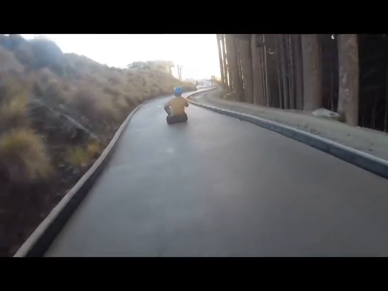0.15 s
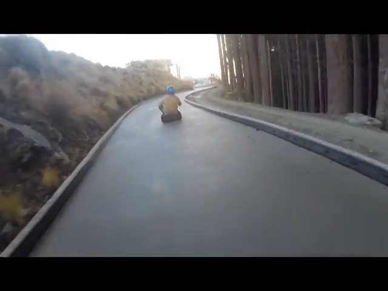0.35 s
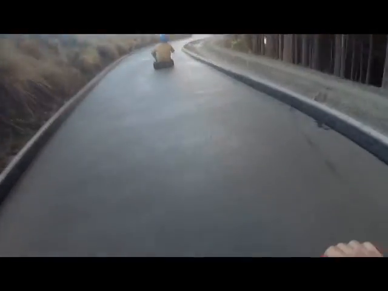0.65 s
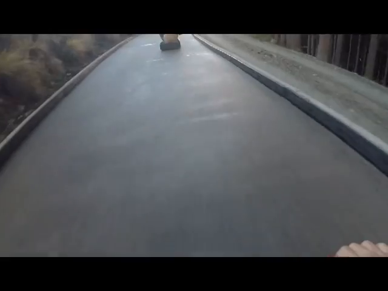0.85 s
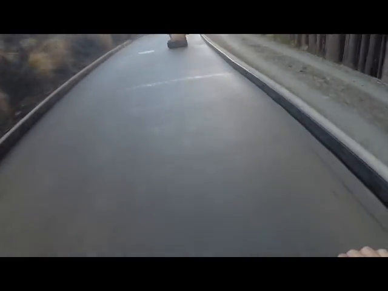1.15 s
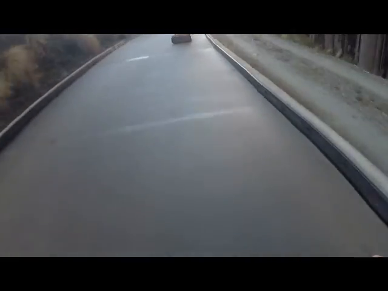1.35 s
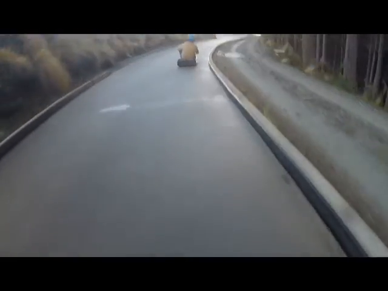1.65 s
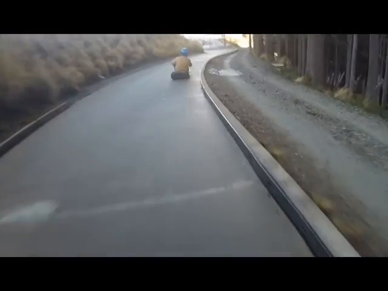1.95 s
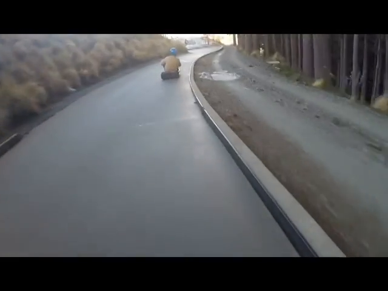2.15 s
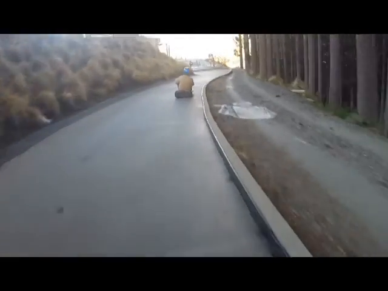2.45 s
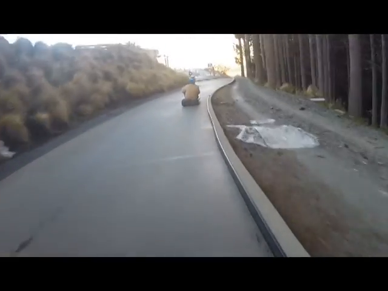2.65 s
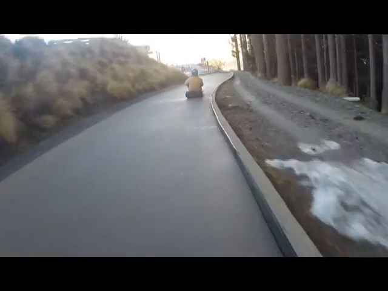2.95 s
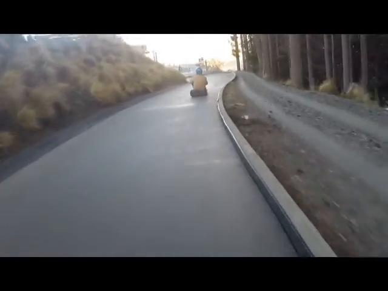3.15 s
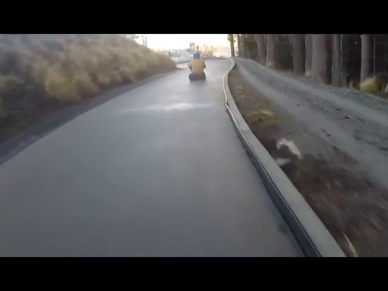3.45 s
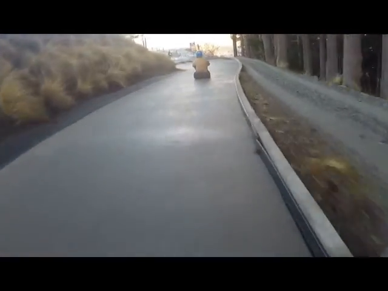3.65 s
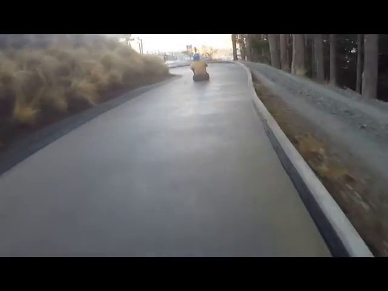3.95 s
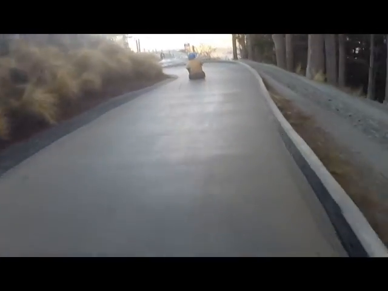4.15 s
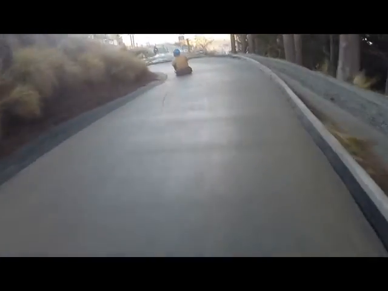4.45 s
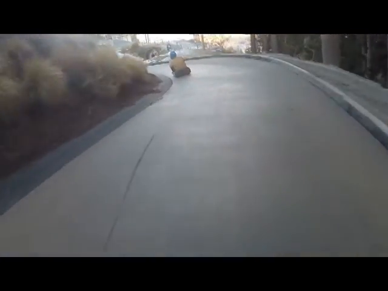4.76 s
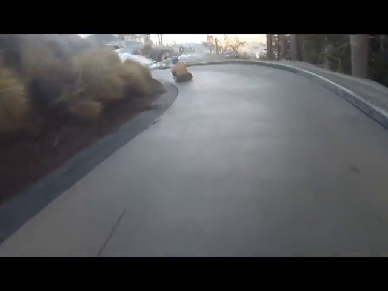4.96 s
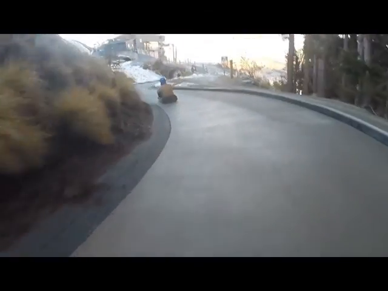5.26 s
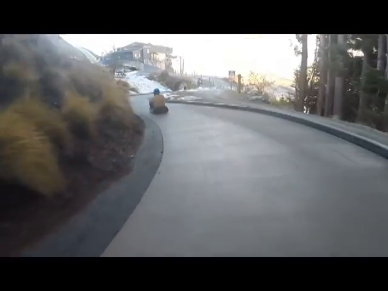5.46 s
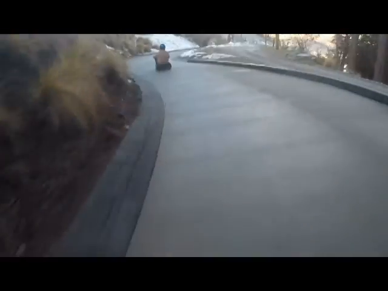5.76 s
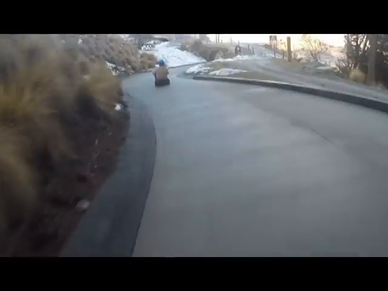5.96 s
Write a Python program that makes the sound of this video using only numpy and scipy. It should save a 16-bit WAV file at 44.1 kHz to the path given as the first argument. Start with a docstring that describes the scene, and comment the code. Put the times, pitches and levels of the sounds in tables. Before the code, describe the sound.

From the first moment a small plastic cart is already rolling fast down an outdoor concrete track, heard close through a closed housing riding on it. A hollow, uneven drumming fills the sound, with boxy rattle, rough tyre roar, faint grit hiss and a thin metallic bearing whir that pulses with the wheels. Deep wind buffets underneath. Soft low bumps pass in the first half second, with a firmer thump at 0.7 s. Brief hums and faint whistling tones drift through. Around 1.5 to 2 s the rattle and bearing ring stand out; near 3 s a cluster of small knocks arrives as wind swells. Two violent jolts strike at 4.04 and 4.13 s, the second a sharp clattering bang, and everything ducks, then slowly recovers. From 4.7 to 5.5 s faint squeaks repeat with each wheel turn. Bumps and loose knocks thicken from 5.3 s, and rolling continues to the end at about 6.1 s.

```python
"""Fast cart on concrete

A small cart rolls fast down a concrete track, heard from inside a closed housing riding on it.
Random grit shakes the deck, tyres and wheel bearings, each heard through its own filters.
Short swelling tones make the bumps; struck modes and noise bursts make the knocks.
Squeaks, narrow gliding tones and low filtered noise for the wind fill in the rest.
A peak limiter ducks everything after a loud bump and lets go slowly."""
import sys
import numpy as np
from scipy import signal
from scipy.fft import rfft, irfft
from scipy.io import wavfile
from scipy.ndimage import uniform_filter1d, minimum_filter1d

SR = 44100
rng = np.random.default_rng(int(sys.argv[2]) if len(sys.argv) > 2 else 0)


def generate_wav(signal):
    """Clip the signal to [-1, 1] and save it as 16-bit WAV at the path in sys.argv[1]."""
    frames = np.transpose(np.atleast_2d(signal))
    scaled = np.clip(frames, -1, 1) * 32767
    pcm = np.round(scaled).astype(np.int16)
    wavfile.write(sys.argv[1], SR, pcm)


N = 269892
T = np.arange(N) / SR  # time of every sample, in seconds

# how loudly the track works on the cart: start_s, deck_shake_db, tyre_roar_db, grit_hiss_db
TRACK_LEVELS = [(0, -19.5, -39.5, -55), (.4, -18.5, -38.5, -53), (.66, -17, -38, -49.5),
                (.8, -17, -36.5, -50), (1.15, -15.5, -40.5, -54), (1.55, -21, -36.5, -55),
                (1.95, -19, -37.5, -56), (2.2, -17.5, -39, -56), (2.42, -18, -37, -57),
                (2.7, -15.5, -37, -52), (3.0, -14, -35, -51), (3.3, -14.5, -34.5, -49.5),
                (4.0, -18.5, -36.5, -52.5), (4.08, -13, -38.5, -54), (4.35, -16.5, -36.5, -52.5),
                (4.9, -18, -35.5, -52), (5.25, -15.5, -34.5, -55.5), (5.55, -14.5, -34.5, -50),
                (6.12, -13, -33.5, -50)]
# deepest deck modes: pitch_hz, width_hz, level_db
DECK_BOOM_MODES = [(157.3, 39.7, -3.5), (227.2, 36, -7)]
# middle deck modes: pitch_hz, width_hz, level_db
DECK_DRUM_MODES = [(290.3, 67.3, -0.5), (413.5, 87, -5.5), (508.3, 66, -10), (564, 96, -5.5)]
# upper deck modes, also rung by knocks: pitch_hz, width_hz, level_db
DECK_RATTLE_MODES = [(692, 119, 1.5), (811, 94, -0.5), (881, 93, 1), (993, 66, -2), (1076, 100, -8)]
# upper deck modes against the deck shake: start_s, level_db
RATTLE_LEVELS = [(0, -12), (.5, -11), (.68, -11.5), (.75, -12.5), (1.0, -13.5), (1.3, -10.5), (1.8, -6.5),
                 (2.3, -11.5), (2.7, -9.5), (3.1, -9.5), (3.5, -10), (4.0, -8.5), (4.1, -12), (4.5, -10.5),
                 (5.0, -8.5), (5.5, -11.5), (6.12, -16.5)]
# thin panel modes that come and go: pitch_hz, width_hz, level_db
PANEL_MODES = [(226.6, 17, 3.5), (361.5, 12.2, -5.5), (480.6, 12, -2), (583.7, 10.6, -3.5),
               (1009.4, 30, -13)]
BOOM_OVER_SHAKE_DB, PANELS_OVER_SHAKE_DB = 2.5, -8.5
HUM_DB = -1.46  # middle gain of the deck hum

# load on the wheel bearings: start_s, ring_level_db, race_pitch_hz, race_over_axle_db
BEARING_LOAD = [(0, -48, 3460, -3), (.64, -45, 3395, -1), (.74, -45, 3280, -5), (.9, -46, 3390, -2.5),
                (1.1, -44.5, 3440, -6), (1.35, -47, 3410, -6), (1.45, -43, 3320, -3.5),
                (1.62, -40.5, 3290, -0.5), (1.9, -43.5, 3400, -2), (2.2, -44.5, 3280, -4),
                (2.6, -41, 3340, -1), (3.0, -42, 3320, -1), (3.25, -41.5, 3300, 1.5),
                (3.6, -40.5, 3303, 2.5), (3.98, -40.5, 3326, 2.5), (4.08, -45.5, 3300, 1),
                (4.6, -45.5, 3370, 3.5), (4.75, -51, 3410, -4), (5.18, -46.5, 3380, -1),
                (5.3, -45.5, 3470, 2.5), (5.55, -47.5, 3480, 0), (5.75, -42.5, 3430, -4),
                (5.86, -43, 3130, 0), (5.93, -48.5, 3220, -3), (6.0, -44, 3150, 5), (6.12, -42, 3160, 1)]
# bearing and axle modes: pitch_hz, width_hz, level_db
AXLE_MODES = [(2940, 81, -8), (3995, 140, -6), (4353, 110, -9), (4460, 110, -9), (4830, 270, -13.5),
              (6040, 260, -21.5), (7280, 230, -25), (8760, 400, -30)]
# wheel speed: start_s, turns_per_s
WHEEL_SPEED = [(0, 19), (2.5, 26), (4.5, 25), (6.12, 25)]

# filter shape of the tyre roar: pitch_hz, gain_db
ROAR_SHAPE = [(300, -4), (1000, 3.5), (1500, 2), (2100, -2.5), (2700, -7.5), (3600, -7.5), (5500, -47.5)]
# filter shape of the grit hiss: pitch_hz, gain_db
HISS_SHAPE = [(2500, -7), (3700, -3), (4600, 1.5), (5150, 4.5), (5600, 1), (6500, 1), (7500, -0.5),
              (8100, -6), (9200, -3.5), (10500, -9), (12500, -12), (13700, -24.5), (14800, -47.5)]

# wheels over joints and bumps: start_s, strength_db, bounce_hz, length_ms
BUMP_EVENTS = [(0.106, -5.5, 193, 32.7), (0.18, -2, 182, 16.3), (0.383, -15, 214, 21.5),
               (0.434, -16, 274, 22), (0.518, -10, 177, 13), (0.613, -3.5, 211, 25), (0.709, 5.5, 195, 15),
               (1.21, -2, 169, 19), (1.708, -3.5, 193, 22), (2.072, 0.5, 178, 17.5), (2.203, 0, 213, 21.3),
               (2.66, -5.5, 219, 21.6), (2.802, -8.5, 183, 32), (2.968, -1.5, 184.8, 18.3),
               (3.419, -1, 228, 9.2), (3.536, 2.5, 206, 15), (3.881, -7, 188, 26.3), (4.0365, 12, 174, 19),
               (4.1325, 15, 290, 9.5), (4.144, 1.5, 200, 20), (4.446, -3, 187, 19.3),
               (4.927, -3, 219, 15.3), (5.223, -3.5, 218, 18.7), (5.373, 3, 202, 11),
               (5.459, 3.5, 270, 6.7), (5.708, -1, 228, 26), (5.82, 3.5, 194, 16.2),
               (5.936, -1.5, 158, 21.8)]
# loose parts and stones: start_s, strength_db, treble_tilt_db, fall_by_60_db_s, deck_body_db
KNOCK_EVENTS = [(.665, -19, -16, .03, -1), (2.300, -21, -16, .03, 1), (2.831, -19, -16, .03, 1),
                (2.924, -20, -15, .025, -5), (2.965, -19, -17, .03, -2), (2.9955, -13, -13, .016, -10),
                (3.002, -16, -14, .034, -6), (3.034, -20, -17, .025, -2), (3.066, -17, -17, .03, -3),
                (3.632, -14, -26, .07, 6), (4.039, -9, -8, .03, 0), (4.135, -1, -10, .016, 1),
                (4.140, -4, -20, .055, 3), (4.175, -10, -20, .036, -1), (4.466, -22, -18, .03, 1),
                (5.310, -20, -15, .03, 0), (5.344, -17, -15, .035, -1), (5.454, -17, -14, .035, 0),
                (5.568, -20, -16, .03, 1), (5.706, -17, -8, .022, -2), (5.713, -11, -13, .04, -3),
                (5.76, -19, -17, .03, 0), (5.786, -14, -8, .035, -8), (5.796, -24, -6, .035, -5),
                (5.808, -19, -17, .025, -8), (5.829, -17, -16, .04, -2), (5.929, -12, -17, .034, 0),
                (6.033, -15, -18, .045, 0)]
STRIKE_DB = 2  # peak of the struck deck modes against the rattle's starting strength
CRACK_HZ, CRACK_WIDTH_HZ, CRACK_DB = 1700, 260, -11

# a wheel rubbing once a turn in the bend: start_s, level_db
RUB_LEVELS = [(4.62, -75), (4.69, -43), (4.85, -45), (5.0, -44), (5.15, -50), (5.35, -49), (5.5, -55),
              (5.6, -75)]
# where each rub squeaks: pitch_hz, scatter_hz
RUB_PITCHES = [(2450, 270), (3350, 100)]
RUB_S, RUB_WIDTH_HZ, RUB_SPREAD_DB = 0.03, 150, 2.5

# passing narrow tones: start_s, length_s, level_db, first_hz, last_hz, width_hz
PASSING_TONES = [(0.284, 0.24, -45, 1590, 1660, 67), (0.348, 0.163, -20, 335, 296, 6.2),
                 (0.879, 0.45, -51, 2100, 1864, 46), (0.97, 0.62, -51.5, 1700, 1530, 60),
                 (2.81, .08, -65, 13300, 13300, 200), (3.16, 0.445, -31, 790, 820, 6),
                 (3.38, .082, -67, 13250, 13350, 200), (4.66, .6, -49.5, 3950, 4030, 130),
                 (.86, .36, -23.5, 390, 460, 12), (1.33, 0.18, -24.5, 483, 468, 13),
                 (.5, 0.11, -32.5, 830, 1020, 30), (.25, 0.2, -29, 540, 600, 22),
                 (.53, .17, -25.5, 436, 545, 61), (4.3, 0.26, -49, 1500, 1980, 80),
                 (5.853, 0.084, -42, 3050, 3100, 520), (6.043, 0.041, -47, 3650, 3800, 150),
                 (4.9, 0.66, -60.5, 6000, 6100, 200)]
TONE_FADE = 0.36  # share of the length spent fading in and out
FLUTTER_DB, FLUTTERS_PER_S = 3.5, 25

# filter shape of the wind: pitch_hz, gain_db
WIND_SHAPE = [(10, -30), (22, 3), (55, 7), (100, 1.5), (140, -1), (300, -49), (1000, -78.5)]
# wind on the housing, before gusts: start_s, level_db
WIND_LEVELS = [(0, -23.5), (.6, -27.5), (1.0, -23.5), (1.7, -20), (2.5, -22), (3.0, -17), (3.7, -18),
               (4.2, -26.5), (4.7, -19), (5.2, -22.5), (6.12, -17.5)]
GUST_DB, GUSTS_PER_S = 2, 12

CEILING = .97  # highest output of the soft overload, before the band limit
EDGE_HZ = 14850  # upper edge of the sound


def gain_of(db):
    """Turns decibels into a multiplier."""
    return 10 ** (np.asarray(db) / 20)


def evened(x):
    """Scales a sound to an average (rms) strength of 1."""
    return x / np.sqrt(np.mean(x ** 2) + 1e-20)


def at_level(x, db):
    """Evens a sound, then gives it a fixed or changing level."""
    return evened(x) * gain_of(db)


def along(rows):
    """Draws each column of a table as a curve over all samples."""
    s, *columns = np.transpose(rows)
    return [np.interp(T, s, column) for column in columns]


def add(mix, s, sound):
    """Adds a sound to the mix from s seconds on, cut off at the end."""
    part = mix[round(s * SR):][:len(sound)]
    part += sound[:len(part)]


def waver(per_s):
    """Smooth random curve of rms 1 with about per_s changes a second."""
    size = round(SR / per_s / 2)
    smooth = uniform_filter1d(rng.standard_normal(N), size)
    return evened(uniform_filter1d(smooth, size))


def grit(rough_db, spread_db):
    """Noise like dense contacts of uneven size, stronger where rough_db is higher."""
    return rng.standard_normal(N) * gain_of(rough_db + spread_db * rng.standard_normal(N))


def resonate(x, hz, width):
    """A steep resonance: shifts the pitch hz down to zero, smooths twice and shifts back."""
    turn = np.exp(2j * np.pi * np.cumsum(hz * np.ones(len(x))) / SR)
    r = np.exp(-np.pi * 1.55 * width / SR)  # 1.55 makes up for smoothing twice
    smooth = signal.lfilter([(1 - r) ** 2], [1, -2 * r, r * r], x / turn)
    return 2 * (turn * smooth).real


def ring(x, modes, patchy_db, drift, swells_per_s=1.23):
    """Rings modes of alternating sign; each swells and drifts in pitch by chance."""
    out = np.zeros(len(x))
    for k, (hz, width, db) in enumerate(modes):
        gain = gain_of(db + patchy_db * waver(swells_per_s))
        drifting_hz = hz * (1 + drift * waver(4.07))
        out += (-1) ** k * gain * resonate(x, drifting_hz, width)
    return out


def colour(x, points):
    """Filters a sound by a shape table, joining its points on a log pitch scale."""
    f, db = np.transpose(points)
    hz = np.fft.rfftfreq(len(x), 1 / SR)
    curve_db = np.interp(np.log(hz + 1), np.log(f + 1), db)
    return irfft(rfft(x) * gain_of(curve_db), len(x))


def track_surface():
    """Coarse and smooth patches, as a curve felt by deck, tyres and bearings alike."""
    return 4 * np.tanh(0.11 * waver(50) + 0.74 * waver(38))


def deck(track):
    """Grit shakes the plastic deck, which answers at its own pitches from boom to rattle."""
    shake_db = along(TRACK_LEVELS)[0]
    boom_grit = grit(.5 * track + 1.32 * waver(35), 2.6)
    boom = ring(boom_grit, DECK_BOOM_MODES, patchy_db=1.3, drift=0.035, swells_per_s=6.4)
    shake = grit(0.62 * track, 2.56)
    drum = ring(shake, DECK_DRUM_MODES, patchy_db=2.0, drift=0.032, swells_per_s=5.2)
    hum = resonate(shake, 478 * (1 + 0.013 * waver(6.8)), 41.5)
    drum += gain_of(HUM_DB + 1.9 * waver(2.2)) * hum
    rattle = ring(grit(0.5 * track, 3.4), DECK_RATTLE_MODES, patchy_db=0.5, drift=0.011)
    panels = ring(shake, PANEL_MODES, patchy_db=4.5, drift=0.018, swells_per_s=3.05)
    low = at_level(boom, shake_db + BOOM_OVER_SHAKE_DB) + at_level(drum, shake_db)
    high = at_level(rattle, shake_db + along(RATTLE_LEVELS)[0])
    return low + high + at_level(panels, shake_db + PANELS_OVER_SHAKE_DB)


def bearings(track):
    """Grit rings the axle modes; a flat spot loads the bearing race once a turn."""
    ring_db, race_hz, race_db = along(BEARING_LOAD)
    turns_per_s = along(WHEEL_SPEED)[0] * (1 + 0.046 * waver(5.4))
    turn = np.cos(2 * np.pi * np.cumsum(turns_per_s) / SR)
    axle_grit = grit(0.72 * track + 0.3 * turn + 1.0 * waver(30), 3.0)
    axle = ring(axle_grit, AXLE_MODES, patchy_db=1.3, drift=0.0045)
    balls = grit(1.1 * track + 2.0 * turn + 1.4 * waver(38), 3.9)
    race = resonate(balls, race_hz * (1 + 0.007 * waver(9.9)), 120)
    return at_level(axle + gain_of(race_db) * race, ring_db)


def tyres(track):
    """Tyres on rough concrete: one noise filtered to a roar, another to a bright grit hiss."""
    _, roar_db, hiss_db = along(TRACK_LEVELS)
    roar = colour(grit(0.087 * track + 0.82 * waver(45), 3.5), ROAR_SHAPE)
    hiss = colour(grit(0.3 * track + .9 * waver(90), 3.2), HISS_SHAPE)
    return at_level(roar, roar_db) + at_level(hiss, hiss_db)


def bumps():
    """The deck bounces on its wheels for a few cycles: a low tone swells and dies at once."""
    out = np.zeros(N)
    for s, db, hz, ms in BUMP_EVENTS:
        t = np.arange(0, ms / 1000, 1 / SR)
        swell = np.sin(np.pi * (t / t[-1]) ** 0.87) ** 2
        bounce = np.sin(2 * np.pi * hz * (t - t[-1] / 2))
        add(out, s, gain_of(db) * swell * bounce)
    return out


def knocks():
    """A blow rings the upper deck modes, with a short dull or bright rattle of noise."""
    out, t = np.zeros(N), np.arange(4096) / SR
    strike = np.zeros(len(t))
    for hz, width, db in DECK_RATTLE_MODES:
        strike += gain_of(db) * np.exp(-np.pi * width * t) * np.sin(2 * np.pi * hz * t)
    strike *= 1 - np.exp(-t / .0008)  # softened start
    strike *= gain_of(STRIKE_DB) / abs(strike).max()
    crack = np.exp(-np.pi * CRACK_WIDTH_HZ * t) * np.sin(2 * np.pi * CRACK_HZ * t)
    for s, db, tilt_db, fall_s, body_db in KNOCK_EVENTS:
        shape = [(120, body_db - 18), (300, body_db), (600, body_db), (1050, body_db - 3),
                 (1400, -20), (2100, -21 + tilt_db / 3), (3500, -20 + tilt_db),
                 (12000, -30 + 3 * tilt_db), (15000, -45 + 3 * tilt_db)]
        fade_db = -60 * (t / fall_s) ** 2  # holds for a moment, then stops
        burst = colour(rng.standard_normal(len(t)), shape)
        rattle = at_level(burst, fade_db) * np.minimum(t / .001, 1)
        thin_crack = gain_of(CRACK_DB - body_db) * crack  # strongest in knocks with little body
        add(out, s, gain_of(db) * (rattle + strike + thin_crack))
    return out


def rubs():
    """A wheel rubs once a turn: short squeaks of narrow noise, each at its own pitch."""
    out, (s, db) = np.zeros(N), np.transpose(RUB_LEVELS)
    whole_turns = np.floor(np.cumsum(along(WHEEL_SPEED)[0]) / SR)
    starts = T[1:][np.diff(whole_turns) > 0]
    starts = starts[(starts > s[0]) & (starts < s[-1])]
    count = round(RUB_S * SR)
    for start in starts:
        for hz, scatter_hz in RUB_PITCHES:
            pitch_luck, level_luck, time_luck = rng.standard_normal(3)
            noise = rng.standard_normal(2048)
            tone = resonate(noise, hz + scatter_hz * pitch_luck, RUB_WIDTH_HZ)[-count:]
            level_db = np.interp(start, s, db) + RUB_SPREAD_DB * level_luck
            add(out, abs(start + .004 * time_luck), at_level(tone, level_db) * np.hanning(count))
    return out


def tones():
    """Fuzzy whistles and hums: noise in a narrow gliding resonance, with a fluttering level."""
    out = np.zeros(N)
    for s, length, db, first_hz, last_hz, width in PASSING_TONES:
        count = round(length * SR)
        glide_hz = np.linspace(first_hz, last_hz, count)
        tone = resonate(rng.standard_normal(count), glide_hz, width)
        add(out, s, at_level(tone, db) * signal.windows.tukey(count, TONE_FADE))
    return out * gain_of(FLUTTER_DB * np.tanh(waver(FLUTTERS_PER_S)))


def wind():
    """Wind buffets the housing: deep filtered noise whose level gusts up and down."""
    level_db = along(WIND_LEVELS)[0] + GUST_DB * waver(GUSTS_PER_S)
    return at_level(colour(grit(0.66 * waver(9.5), 0.1), WIND_SHAPE), level_db)


def scene():
    """One track surface drives deck, bearings and tyres; the other sounds are added on top."""
    track = track_surface()
    rolling = deck(track) + bearings(track) + tyres(track)
    return (rolling + bumps() + knocks() + rubs() + tones() + wind())[None]


def record(dry):
    """A look-ahead peak limiter drops fast and lets go slowly, then overload and a band limit."""
    peak = -minimum_filter1d(-abs(dry), size=500, origin=-249)  # loudest of the next 500 samples
    peak_db = 20 * np.log10(peak + 1e-9)
    over = np.log(np.maximum(peak_db + 3.0, 1e-6))  # log of the excess above -3 dB
    fall = T / 0.66  # the excess in dB dies away exponentially
    duck_db = np.exp(np.maximum.accumulate(over + fall, axis=1) - fall)
    smooth_duck_db = signal.lfilter([.003], [1, -.997], duck_db)
    held = dry / gain_of(smooth_duck_db)
    soft = held / (1 + abs(held / CEILING) ** 6) ** (1 / 6)  # rounds off what slips through
    band_limit = signal.firwin(511, EDGE_HZ, window=("kaiser", 9), fs=SR)
    return signal.oaconvolve(soft, band_limit[None], "same")


dry = scene()
out = record(dry)
generate_wav(out)
```